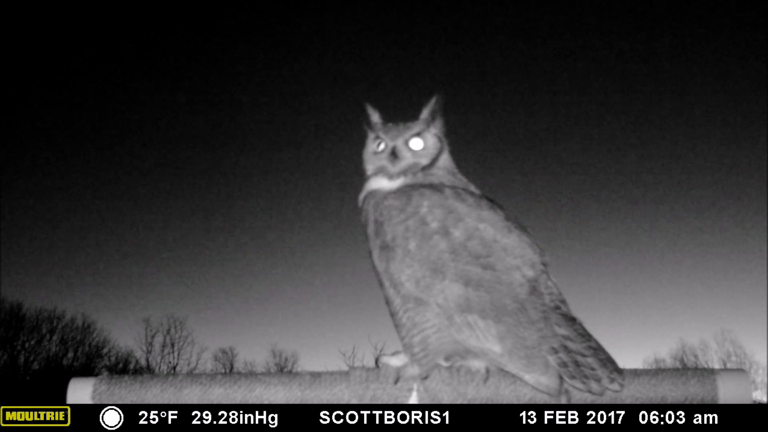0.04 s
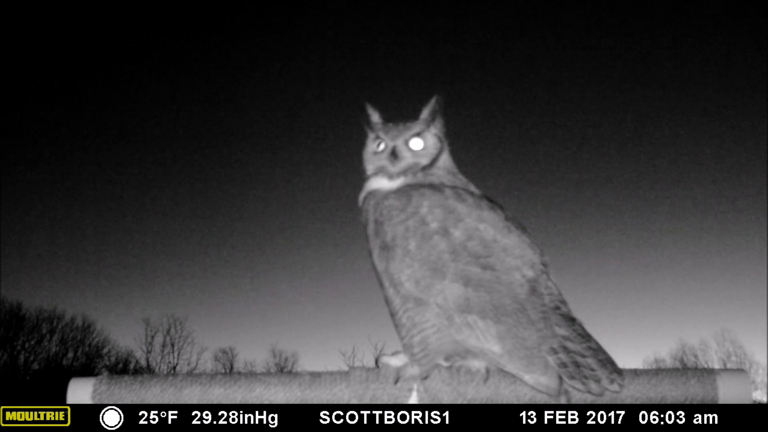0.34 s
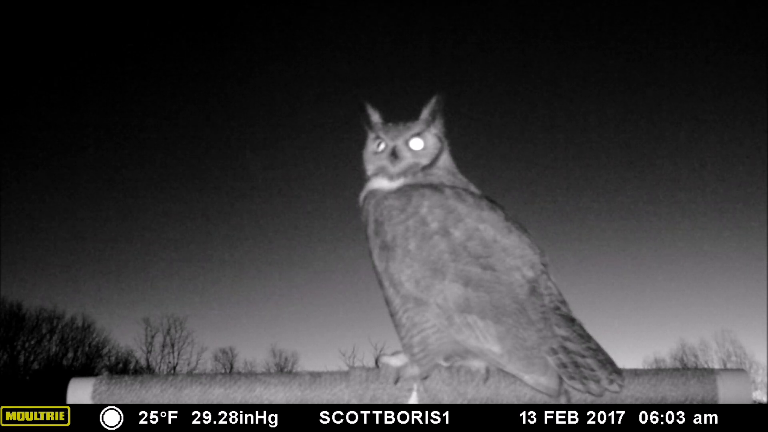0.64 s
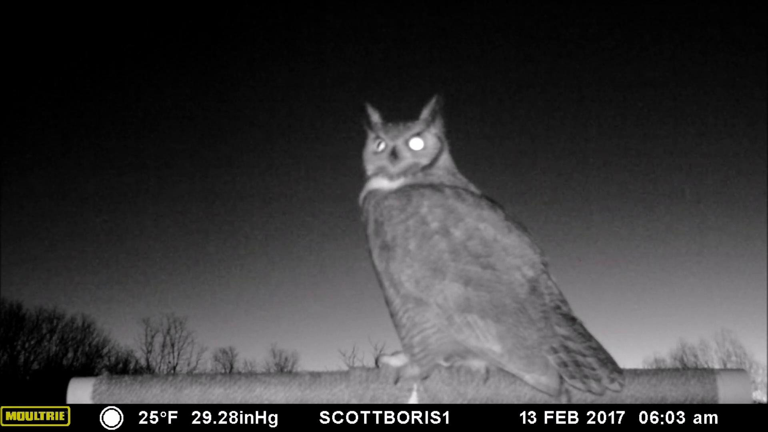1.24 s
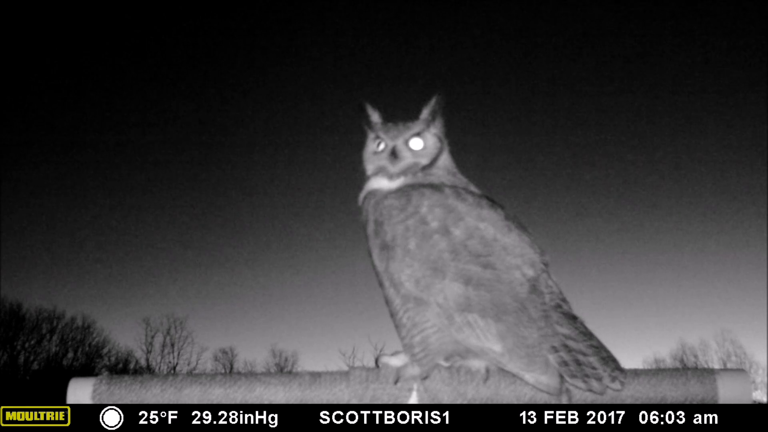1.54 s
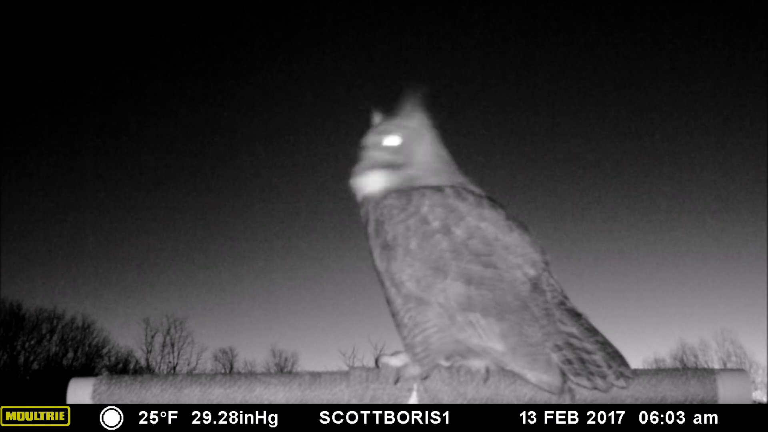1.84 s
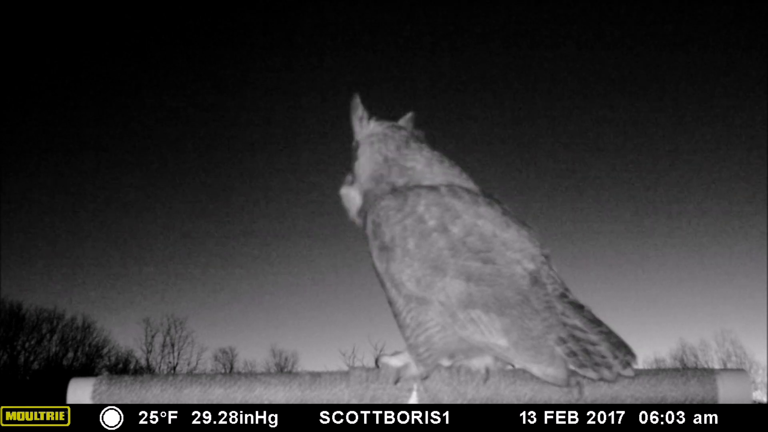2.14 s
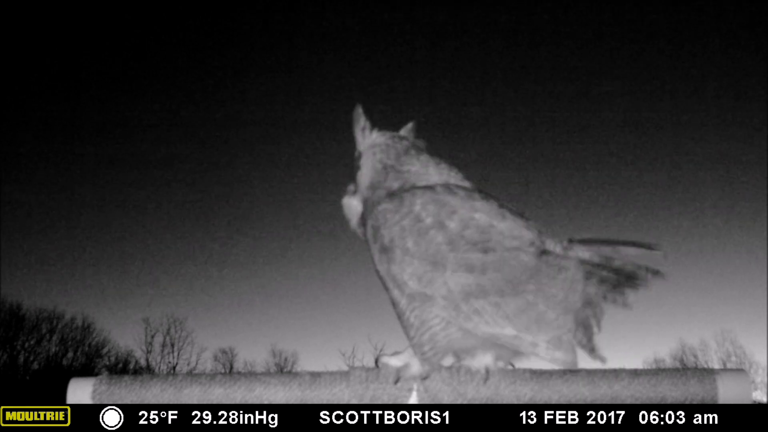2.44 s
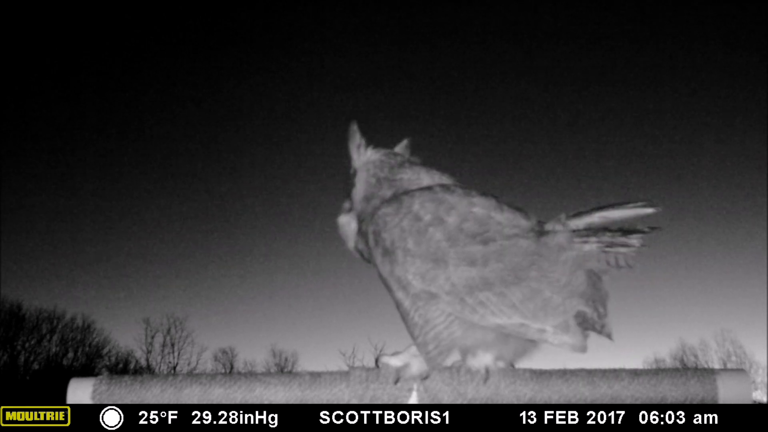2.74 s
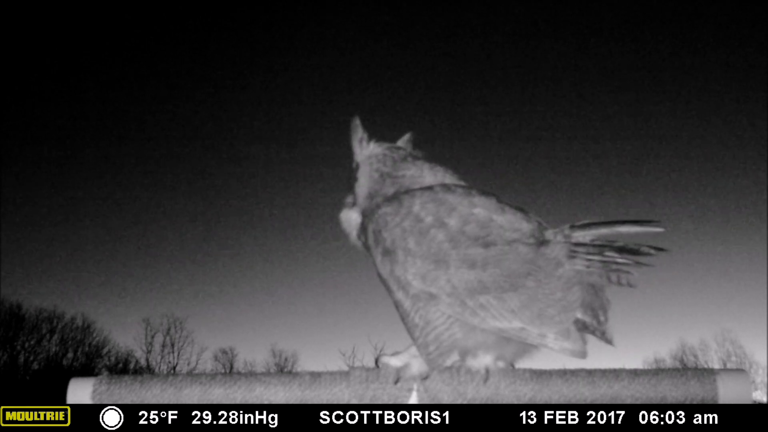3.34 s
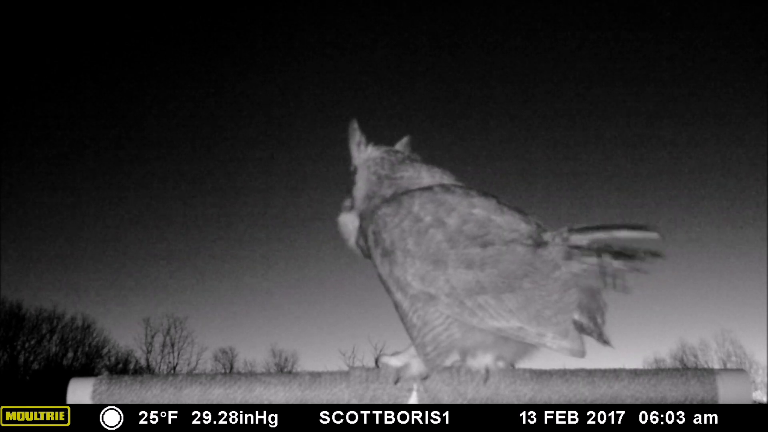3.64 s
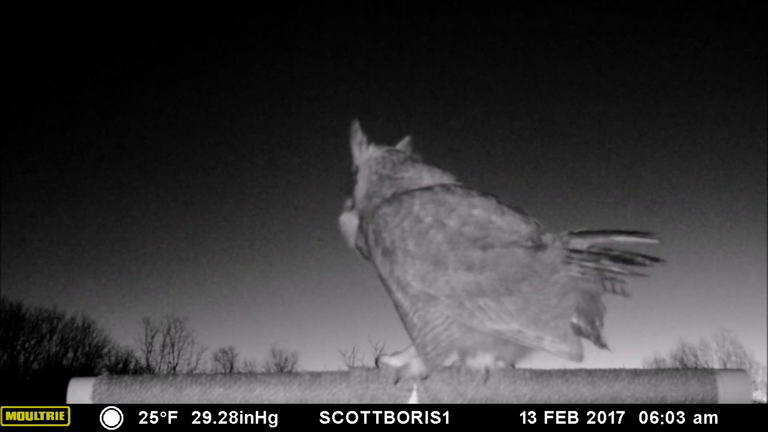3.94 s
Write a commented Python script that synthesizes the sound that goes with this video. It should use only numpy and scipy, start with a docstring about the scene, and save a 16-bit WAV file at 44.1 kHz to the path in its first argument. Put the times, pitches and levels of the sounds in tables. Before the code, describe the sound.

An owl hoots softly three times over faint night hiss and a thin whine.

```python
"""An owl hooting at night

A great horned owl gives three soft hoots on a perch beside a trail camera. Each hoot is a nearly pure
tone that rises and falls in pitch. It sweeps through hollow resonances near the microphone, which
swell, ring on and beat against it, and the trees echo faintly. Behind it are a distant rumble,
a fading wash like far traffic, and the camera's own hiss and thin whine."""
import sys
import numpy as np
from scipy import signal
from scipy.fft import rfft, irfft
from scipy.io import wavfile

SR = 44100
rng = np.random.default_rng(int(sys.argv[2]) if len(sys.argv) > 2 else 0)


def materialize(psi):
    """Save the field psi as 16-bit PCM at rate SR to the path in sys.argv[1].

    A 1-D psi becomes a single channel; in a 2-D psi each row is a channel.
    """
    bounded = np.clip(np.atleast_2d(psi).T, -1, 1)
    quanta = np.round(bounded * 32767).astype(np.int16)
    wavfile.write(sys.argv[1], SR, quanta)


N = 176400
TOP_HZ = 15800  # the camera cuts off sound above this


def owl(t):
    """Each hoot is a pure tone that rises and falls, with a weak overtone an octave above."""
    # One pitch curve for each hoot. Each row: time in seconds, pitch in Hz.
    short_hoot = [(2.203, 187.5), (2.22, 212.6), (2.239, 260.2), (2.263, 266.7), (2.278, 261.5),
                  (2.294, 238), (2.311, 196), (2.331, 165)]
    first_long_hoot = [(2.516, 187.9), (2.555, 262.4), (2.612, 276), (2.657, 283.8), (2.747, 274.7),
                       (2.768, 254.7), (2.793, 260), (2.854, 225.3), (2.883, 164)]
    second_long_hoot = [(3.604, 168.3), (3.63, 237.1), (3.65, 265), (3.675, 276), (3.79, 277.2),
                        (3.858, 267.4), (3.882, 237), (3.912, 250.0), (3.929, 223), (3.953, 166)]
    # Each row: pitch curve, level in dB before the resonances, overtone in dB relative to the tone.
    hoots = [(short_hoot, -51, -11), (first_long_hoot, -49.5, -12.5), (second_long_hoot, -50, -11.5)]
    out = np.zeros(N)
    for curve, db, overtone_db in hoots:
        when, hz = np.array(curve).T
        phase = 2 * np.pi * np.cumsum(np.interp(t, when, hz)) / SR
        tone = swell(t, when[0], when[-1], attack_s=.04, release_s=.043) * np.sin(phase)
        octave = swell(t, when[0], when[-1], attack_s=.03, release_s=.022) * np.sin(2 * phase)
        out += gain(db) * (tone + gain(overtone_db) * octave)
    return out


def hollow_ring(sound, t):
    """The sound plus the ringing it sets off in hollow things, probably the perch and camera case."""
    # Each row: pitch in Hz, width in Hz, boost over the direct sound in dB, sign (-1 flips the wave).
    resonances = [(210.4, 26.6, 10.5, -1), (224, 11.6, 17, 1), (239.8, 11.6, 7, 1), (275.1, 9.5, 16, 1)]
    late = np.interp(t - .0026, t, sound)  # the ringing starts 2.6 ms later
    return sound + sum(sign * gain(db) * resonate(late, hz, width) for hz, width, db, sign in resonances)


def tree_echoes(sound, t):
    """The trees scatter the sound back as a faint blur of echoes."""
    delay_s, fade_s = .074, .35  # the echoes fall by 60 dB in fade_s
    tail = rng.standard_normal(N) * gain(-60 * t / fade_s) * (t > delay_s)
    return gain(-32.5) * signal.fftconvolve(sound, tail / np.linalg.norm(tail))[:N]


def rumble_and_hiss(t):
    """Steady distant rumble and microphone hiss; the treble dips briefly four times."""
    # Each row: frequency in Hz, relative strength of the noise there in dB.
    spectrum = [(12, -35), (20, -6), (54, -1), (108, -1.5), (131, -2.5), (181, -16.5), (215, -16.5),
                (289, -19.5), (344, -17), (452, -20), (903, -16), (1310, -21.5), (2370, -29), (4620, -33.5),
                (7400, -36), (9620, -61), (16300, -120)]
    # Each row: time in seconds, depth of the dip in dB.
    dips = [(.26, -12), (.325, -10), (1.497, -22), (2.223, -19)]
    hiss_from_hz, dip_above_hz, dip_s = 7370, 1200, .007
    hiss = set_level(shaped_noise([(hiss_from_hz / 2, 0), (TOP_HZ, 0)]), -78.5)
    hiss = signal.sosfilt(signal.butter(8, hiss_from_hz, "high", fs=SR, output="sos"), hiss)
    noise = set_level(shaped_noise(spectrum), -64.5) + hiss
    treble = signal.sosfiltfilt(signal.butter(2, dip_above_hz, "high", fs=SR, output="sos"), noise)
    dip_db = sum(db * np.exp(-np.abs(t - when) / dip_s) for when, db in dips)
    return noise + treble * (gain(dip_db) - 1)


def far_wash(t):
    """Broad bands of noise, like far traffic, that slowly fade."""
    # Each row: centre in Hz, width in Hz, starting level in dB.
    bands = [(340.4, 120, -83), (910, 540, -77.5), (2530, 970, -80.5), (3650, 750, -87)]
    fade_db_per_s = -4.5
    wash = np.zeros(N)
    for hz, width, db in bands:
        band = resonate(rng.standard_normal(N), hz, width)
        wash += set_level(resonate(band, hz, width), db)  # filtered twice for steeper edges
    return wash * gain(fade_db_per_s * t)


def camera_whine(t):
    """The electronics give a thin tone in soft fuzz, faint side tones and a very high line-scan tone."""
    # Each entry: level of one side tone in dB, from the highest tone down.
    side_levels = [-87, -93.5, -100, -103]
    whine_hz, line_scan_hz, top_side_hz, frame_rate_hz = 7998.8, 15734.3, 7882.1, 30
    tones = [(whine_hz, -60.5), (line_scan_hz, -94)]  # pitch in Hz, level in dB
    tones += [(top_side_hz - k * frame_rate_hz, db) for k, db in enumerate(side_levels)]
    whine = sum(np.sqrt(2) * gain(db) * np.sin(2 * np.pi * (hz * t + rng.random())) for hz, db in tones)
    fuzz = resonate(rng.standard_normal(N), whine_hz, width_hz=140)
    return whine + set_level(fuzz, -88.5)


def gain(db):
    """Turn decibels into a number to multiply by."""
    return 10 ** (np.asarray(db) / 20)


def set_level(sound, db):
    """Scale a sound to an average (rms) level in dB."""
    return sound * gain(db) / np.sqrt(np.mean(sound ** 2))


def resonate(sound, hz, width_hz):
    """A resonance lets its own pitch through and weakens the others."""
    return signal.lfilter(*signal.iirpeak(hz, hz / width_hz, fs=SR), sound)


def shaped_noise(points):
    """Noise that follows (Hz, dB) points, from half the lowest frequency up to the highest."""
    hz, db = np.array(points).T
    freqs = np.maximum(np.arange(N // 2 + 1) * SR / N, 1)
    shape = gain(np.interp(np.log(freqs), np.log(hz), db))
    in_range = (freqs > hz[0] / 2) & (freqs < hz[-1])
    return irfft(rfft(rng.standard_normal(N)) * shape * in_range, N)


def swell(t, start, end, attack_s, release_s):
    """A loudness curve that rises, holds and falls between two moments."""
    return np.clip((t - start) / attack_s, 0, 1) * np.clip((end - t) / release_s, 0, 1)


def scene():
    """The owl close by, the night behind it and the camera's own noise, in one channel."""
    t = np.arange(N) / SR
    hoots = hollow_ring(owl(t), t)
    return (hoots + tree_echoes(hoots, t) + rumble_and_hiss(t) + far_wash(t) + camera_whine(t))[None]


def record(dry):
    """The camera cuts off the highest treble."""
    return signal.sosfilt(signal.ellip(12, .1, 70, TOP_HZ, fs=SR, output="sos"), dry)


dry = scene()
out = record(dry)
materialize(out)
```